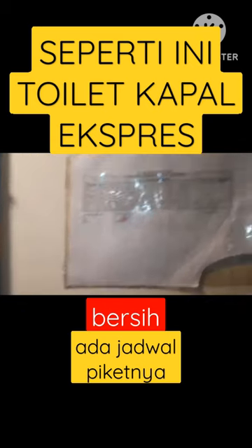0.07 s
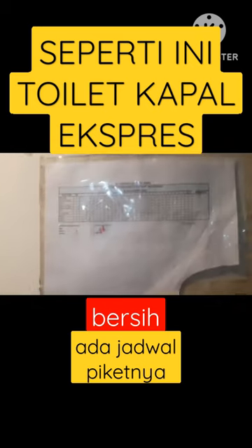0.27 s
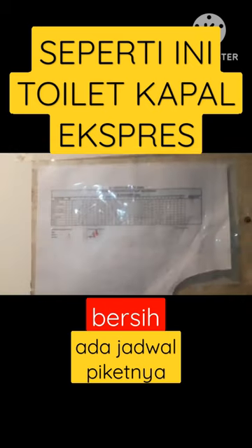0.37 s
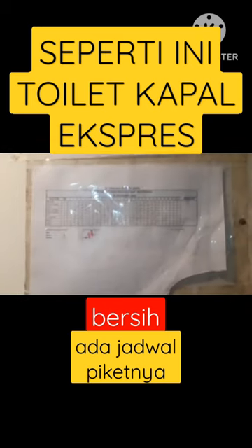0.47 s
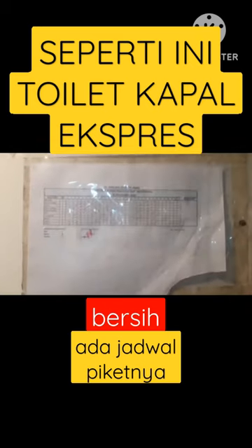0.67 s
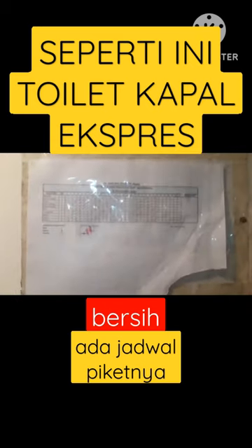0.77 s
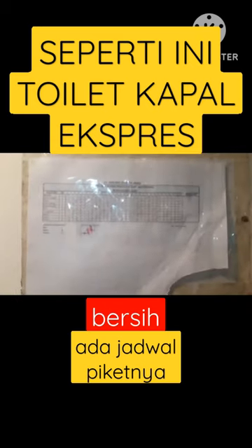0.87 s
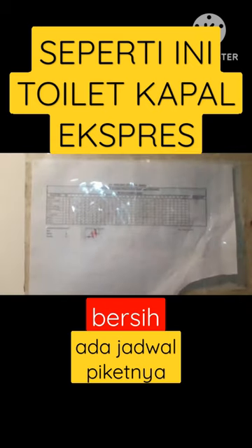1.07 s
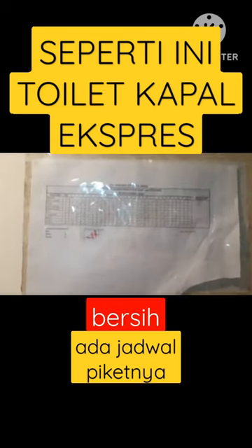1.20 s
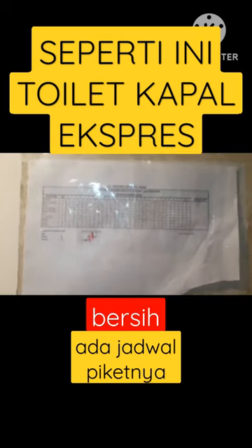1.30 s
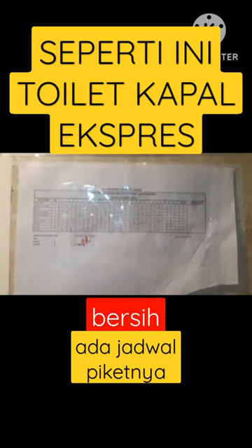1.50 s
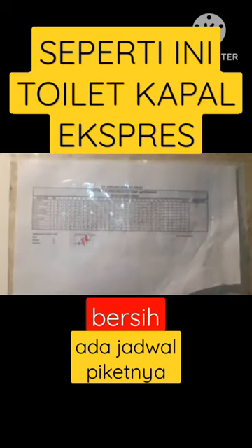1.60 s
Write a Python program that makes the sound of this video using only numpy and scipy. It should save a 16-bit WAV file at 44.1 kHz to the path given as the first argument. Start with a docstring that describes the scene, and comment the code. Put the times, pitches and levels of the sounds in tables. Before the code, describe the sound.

Close to the microphone in a cramped room on a ship, a vacuum toilet gulps water and sucks air in a brief, brightening whoosh. It shuts abruptly with a few thumps, leaving a low machinery rumble.

```python
"""Inside a small cabin on a ship, close to a vacuum toilet. Machinery rumbles and hums through the hull,
and a few dull knocks sound. At 0.4 s the valve opens and water gulps down the pipe. From about 0.6 s
air rushes through the bowl, ringing bowl and pipe and brightening, until the valve shuts at 1.2 s
amid more knocks. The heaviest knock comes at 1.4 s, and the rumble is left louder than it began."""
import sys
import numpy as np
from scipy import signal
from scipy.fft import rfft, irfft
from scipy.io import wavfile

SR = 44100
rng = np.random.default_rng(int(sys.argv[2]) if len(sys.argv) > 2 else 0)


def generate_wav(signal):
    """Clip the signal to [-1, 1] and save it as 16-bit WAV at the path in sys.argv[1]."""
    frames = np.transpose(np.atleast_2d(signal))
    scaled = np.clip(frames, -1, 1) * 32767
    pcm = np.round(scaled).astype(np.int16)
    wavfile.write(sys.argv[1], SR, pcm)


N = 72765
T = np.arange(N) / SR
CUTOFF_HZ = 15550


def from_db(db):
    """Decibels to gain."""
    return 10 ** (np.asarray(db) / 20)


def unit_rms(x):
    """Scale to unit power."""
    return x / np.sqrt(np.mean(x ** 2) + 1e-20)


def envelope(rows):
    """Gain at every sample, from rows of seconds and dB."""
    return from_db(np.interp(T, *np.transpose(rows)))


def drift(rate_hz):
    """A smooth random wander with a spread of 1."""
    step, settle = 40, 2000
    pole = np.exp(-2 * np.pi * rate_hz * step / SR)
    noise = rng.standard_normal(N // step + settle + 2)
    slow = signal.lfilter([1], [1, -2 * pole, pole * pole], noise)[settle:]
    return np.interp(np.arange(N) / step, np.arange(len(slow)), unit_rms(slow))


def ring(x, hz, t60):
    """A damped resonance: a unit click sets a sine of height 1 ringing."""
    r, w = np.exp(-np.log(1000) / (t60 * SR)), 2 * np.pi * hz / SR
    return signal.lfilter([0, np.sin(w)], [1, -2 * r * np.cos(w), r * r], x + 1e-18)


def butter(x, hz, kind, order=2):
    """Butterworth filter."""
    return signal.sosfilt(signal.butter(order, hz, kind, fs=SR, output="sos"), x)


def noise_band(low_hz, high_hz, order=2):
    """Band-passed noise of unit power."""
    return unit_rms(butter(rng.standard_normal(N), [low_hz, high_hz], "band", order))


def third_octaves(x, spectrum):
    """Colour a signal and split it: centres in Hz, and bands that together have unit power."""
    centres = 20 * 2 ** (np.arange(30) / 3)
    log_hz = np.log(np.arange(N // 2 + 1) * SR / N + 1)
    hz, db = np.transpose(spectrum)
    coloured = rfft(x) * from_db(np.interp(log_hz, np.log(hz), db))
    windows = [np.interp(log_hz, np.log(centres), row) for row in np.eye(len(centres))[1:-1]]
    bands = np.array([irfft(coloured * window, N) for window in windows])
    return centres[1:-1, None], bands / bands.sum(0).std()


def hum_line(hz, waver_hz=2, waver_db=6.5, rate_hz=6.6):
    """A sine that wavers in pitch and level."""
    phase = 2 * np.pi * np.cumsum(hz + waver_hz * drift(rate_hz)) / SR
    return unit_rms(np.sin(phase) * from_db(waver_db * drift(rate_hz)))


# Rumble and hum as they reach the cabin. Each row: time in seconds, level in dB.
MACHINERY_LEVEL = [(0, -58), (.38, -56), (.6, -50), (1.2, -50), (1.35, -41), (1.48, -49.5), (1.57, -42.5),
                   (1.65, -48.5)]
# The rumble's colour. Each row: frequency in Hz, relative density in dB.
RUMBLE_SPECTRUM = [(25, -6), (60, -3), (100, 2.5), (200, -7.5), (300, -9.5), (450, -5), (620, -16.5),
                   (1000, -33.5), (1500, -41), (3000, -54.5)]
# The hum. Each row: pitch in Hz, level in dB against the machinery level.
HUM_LINES = [(102.5, -3), (298, -16.5), (383, -8), (428, -14.5), (514, -14.5)]
# The whirr, far in the background. Each row: time in seconds, level in dB.
WHIRR_LEVEL = [(0, -90), (.38, -83), (.6, -58.5), (1.3, -65.5), (1.65, -68.5)]


def machinery():
    """The ship's machinery, heard through the hull: rumble, wavering hum and a faint whirr."""
    _, bands = third_octaves(rng.standard_normal(N), RUMBLE_SPECTRUM)
    rumble = from_db(-2.5) * bands.sum(0)
    hum = sum(from_db(db) * hum_line(hz) for hz, db in HUM_LINES)
    whirr = noise_band(580, 1019, order=3)
    return envelope(MACHINERY_LEVEL) * (rumble + hum) + envelope(WHIRR_LEVEL) * whirr


def cabin_reflections(x, t60=0.23, delay_s=0.012, level_db=-11.5):
    """Short, dense reflections from thin walls close around the microphone; the bass passes out."""
    response = rng.standard_normal(N) * np.exp(-np.log(1000) * T / t60) * (T > delay_s)
    response /= np.linalg.norm(response)
    return from_db(level_db) * signal.fftconvolve(butter(x, 350, "high"), response)[:N]


# Dull knocks in the cabin. Each row: start in seconds, strength in dB, pitch in Hz,
# relative slap and tick strengths in dB, tick centre in Hz, tick width in octaves.
KNOCK_HITS = [(0.052, -41.5, 69.5, -42, -40, 1000, 1.5), (0.13, -40.5, 150, -4, -18, 1000, 1.6),
              (.157, -42.5, 120, -12, -16, 1000, 1.5), (0.1831, -41.5, 131, -2.5, -10.5, 1000, 1.8),
              (0.193, -35, 125, -5.5, -13, 1000, 1.6), (0.2252, -36, 180, -4, -13, 900, 1.5),
              (0.2402, -27, 112, -3, -8, 820, 1.25), (0.395, -36, 113, -16, -20, 1600, 2.6),
              (0.5219, -30.5, 150, -4, -33, 1200, 1.5), (0.587, -29, 190, -10, -28, 1200, 1.5),
              (0.648, -20.5, 134, -7.5, -49, 1000, 1.5), (1.150, -29.5, 220, -8.5, -5, 1780, 2.62),
              (1.154, -19.5, 117.6, 2, -1, 900, 1.5), (1.17, -27, 150, -21, -17, 1200, 1.5),
              (1.179, -36, 152, -18, -12.5, 2200, 2.6), (1.215, -23.5, 157, -12.5, -0.5, 856, 1.98),
              (1.2185, -27, 148, 1, -0.5, 780, 1.83), (1.386, -30, 112, -25, -25, 2700, 0.72),
              (1.3995, -13.5, 129.6, -5.5, -29.5, 4330, 1.53)]


def knocks(thump_cycles=2.85):
    """Each knock is a heavily damped thump, a shorter slap and the tick of the contact."""
    out = np.zeros(N)
    for start, db, hz, slap_db, tick_db, tick_hz, tick_octaves in KNOCK_HITS:
        click = np.zeros(N)
        click[int(start * SR)] = from_db(db)
        thump = ring(click, hz, t60=thump_cycles / hz)
        slap = from_db(slap_db) * ring(click, hz=405, t60=0.0071)
        body = butter(thump - slap, 900, "low", order=3)
        span = 2 ** (tick_octaves / 2)
        tick = butter(click, [tick_hz / span, min(tick_hz * span, CUTOFF_HZ)], "band")
        tick = butter(tick, 6140, "low", order=6)
        out += 1.91 * butter(body, 49, "high") + 7 * from_db(tick_db) * tick
    return out


# Water down in the pipe. Each row: time in seconds, level in dB at full brightness.
WATER_LEVEL = [(.39, -85), (.401, -36), (.45, -38.5), (.495, -45), (.525, -34), (.555, -29.5),
               (.585, -36.5), (.605, -42), (.65, -44), (.7, -39), (.9, -100)]
# The colour of the gulping. Each row: frequency in Hz, relative density in dB.
GULP_SPECTRUM = [(35, -15.5), (70, -7.5), (130, -4), (300, -11), (520, -16), (900, -24.5), (1500, -36.5),
                 (2600, -42), (5000, -64)]
# Fine spray. Each row: time in seconds, level in dB.
SPRAY_LEVEL = [(.38, -100), (.41, -78), (.5, -84.5), (.56, -75), (.62, -81), (.7, -87), (.8, -110)]


def water(gulps_per_s=130, spread_db=3.5, octaves_per_s=12.3):
    """Uneven gulps and churning in the pipe, brighter as air is drawn in, with a hiss of spray."""
    gulp_rate = gulps_per_s * np.exp(0.4 * drift(60))
    gulp_count = np.floor(np.cumsum(gulp_rate) / SR)
    gulps = np.diff(gulp_count, prepend=0) * from_db(spread_db * rng.standard_normal(N))
    churn = rng.standard_normal(N)
    hz, bands = third_octaves(unit_rms(gulps) + churn, GULP_SPECTRUM)
    edge_hz = 162 * 2 ** (octaves_per_s * (T - WATER_LEVEL[0][0]))
    gulping = (bands / np.sqrt(1 + (hz / edge_hz) ** 2)).sum(0)
    return envelope(WATER_LEVEL) * gulping + envelope(SPRAY_LEVEL) * noise_band(1500, 4930)


def resonances(rows):
    """Turbulence rings each resonance as a narrow band of noise."""
    return sum(from_db(db) * noise_band(hz - width / 2, hz + width / 2) for hz, width, db in rows)


# The air jet, close to the bowl. Each row: frequency in Hz, relative density in dB.
JET_SPECTRUM = [(50, -13), (100, -4.5), (200, -8), (330, -6.5), (420, 0), (600, -5), (1000, -8),
                (1400, -15.5), (2500, -17), (3200, -18), (4500, -14.5), (5600, -17), (6800, -19.5),
                (8000, -31), (10000, -52)]
# Resonances of pipe and bowl. Each row: centre in Hz, width in Hz, level in dB at full flow.
PIPE_MODES = [(103.4, 16.7, -44.5), (266.4, 14, -52), (301.4, 17.7, -50), (381.8, 10, -42.5),
              (432, 81, -39), (511, 31, -48.5)]
BOWL_MODES = [(650.4, 35, -57), (890, 22, -65), (917, 29, -58.5), (1062, 19, -57), (1403, 20, -63),
              (1571, 22, -64), (1618, 17, -61), (2021, 21, -58.5), (2068, 27, -62)]


def air_rush(open_s=0.57, full_s=0.79, closing_s=1.0937, shut_s=1.215, flutter_db=1.54):
    """The valve's opening sets level and brightness of the jet, which also sounds bowl and pipe."""
    opening = np.interp(T, [open_s, full_s, closing_s, shut_s], [0, 1, 1, 0])
    fade_db = 500 * np.maximum(open_s - T, 0) + 195 * np.maximum(T - shut_s, 0)
    flow = from_db(-18 * (1 - opening) ** 2 - fade_db)
    shut_edge_hz = 525
    open_edge_hz = 5800 + 19000 * np.maximum(T - full_s, 0)  # keeps brightening once fully open
    edge_hz = shut_edge_hz * (open_edge_hz / shut_edge_hz) ** opening
    hz, bands = third_octaves(rng.standard_normal(N), JET_SPECTRUM)
    flutter = from_db(flutter_db * np.array([drift(20) for _ in hz]))
    rolloff = 0.0087 + 1 / np.sqrt(1 + (hz / edge_hz) ** 7)
    jet = from_db(-37) * (bands * flutter * rolloff).sum(0)
    return flow * (jet + resonances(PIPE_MODES) + opening * resonances(BOWL_MODES))


def scene():
    """Machinery behind, the flush in front, and knocks that come back off the walls, in mono."""
    hits = knocks()
    return (machinery() + water() + air_rush() + hits + cabin_reflections(hits))[None]


def record(dry):
    """One microphone in the cabin, with faint hiss; the deepest bass and the top are cut."""
    heard = butter(dry, 17, "high") + from_db(-78) * rng.standard_normal(N)
    return signal.sosfilt(signal.ellip(10, 0.1, 70, CUTOFF_HZ, fs=SR, output="sos"), heard)


dry = scene()
out = record(dry)
generate_wav(out)
```